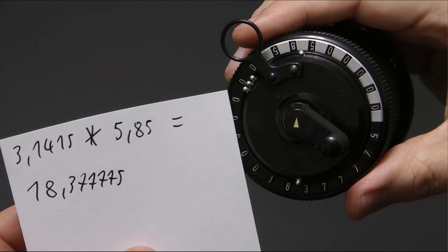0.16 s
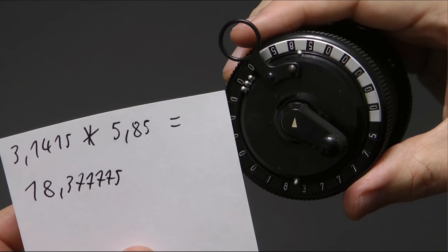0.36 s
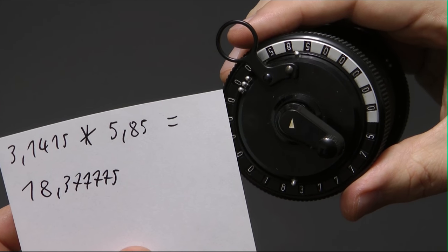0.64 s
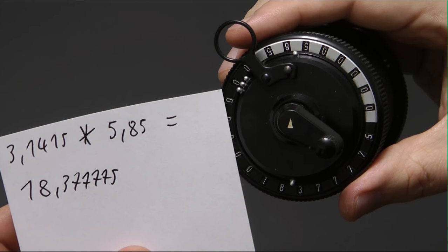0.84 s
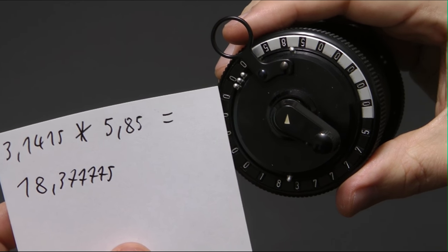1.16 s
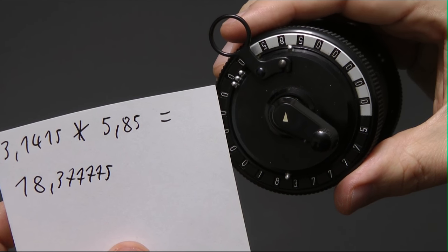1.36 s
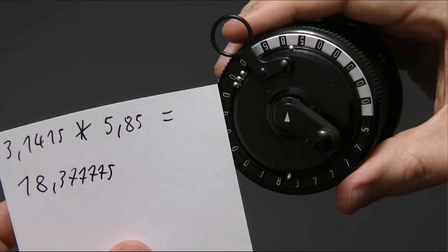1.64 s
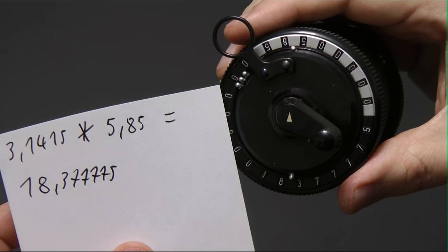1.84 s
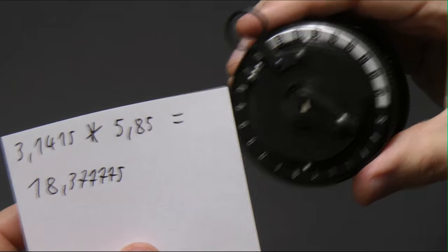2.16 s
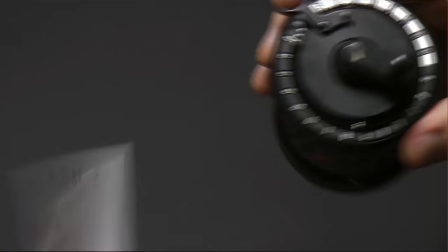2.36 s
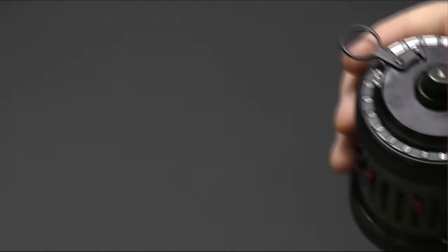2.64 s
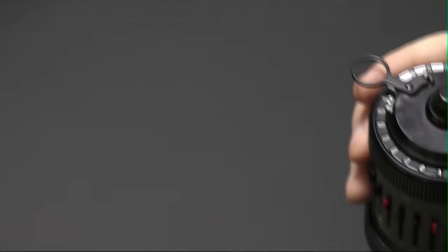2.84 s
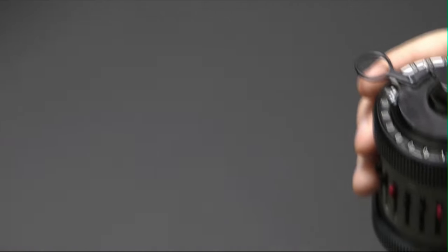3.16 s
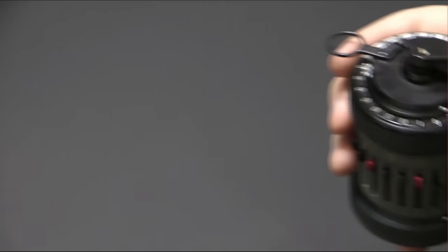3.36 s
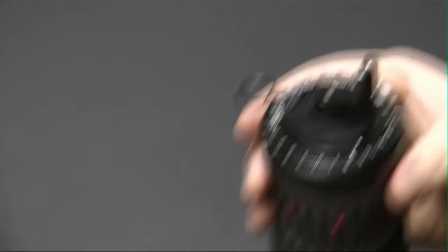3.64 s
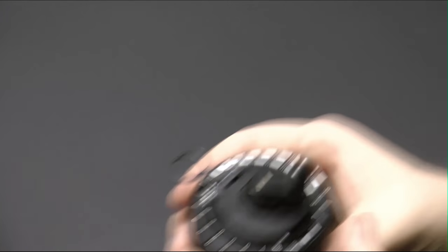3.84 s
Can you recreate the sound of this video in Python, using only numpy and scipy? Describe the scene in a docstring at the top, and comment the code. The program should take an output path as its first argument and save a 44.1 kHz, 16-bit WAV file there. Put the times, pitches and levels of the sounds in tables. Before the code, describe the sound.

A hand-held metal calculator is moved: near silence, then soft thumps, a sharp tick, paper rustle, a hollow clack, loose rattling ticks, a second clack and final tick, in a quiet reverberant room, close microphone.

```python
"""A quiet room: a hand-held metal calculator and a sheet of paper are moved about.
Two clacks are noise decays with blurred body modes; ticks and thumps are short decaying sines; paper is grainy noise.
A small motor whines in sines over hum, a thin tone that comes and goes, and filtered-noise hiss that swells slowly.
The left microphone port hears almost no bass."""
import sys
import numpy as np
from scipy import signal
from scipy.fft import rfft, irfft, next_fast_len
from scipy.io import wavfile
from scipy.ndimage import uniform_filter1d, map_coordinates

SR = 44100
rng = np.random.default_rng(int(sys.argv[2]) if len(sys.argv) > 2 else 0)


def int16_out(signal):
    """Quantize to a 16-bit WAV file."""
    q = np.round(np.clip(np.atleast_2d(signal).T, -1, 1) * 32767)
    wavfile.write(sys.argv[1], SR, q.astype(np.int16))


def how_loud(loudness_db):
    """Turn decibels into a plain amplitude multiplier (0 dB gives 1, 20 dB gives 10)."""
    steps = np.asarray(loudness_db, float) / 20
    return 10 ** steps


N = 176400

# clacks: (time [s], level [dB], build-up time constant [s], ring against wash [dB])
CLACKS = [(2.640, -22, .002, -14), (3.573, -20.5, 0.0017, -3.5)]
# one noise spectrum per clack: (frequency [Hz], relative density [dB per Hz])
CLACK_SPECTRA = [
    [(59, -41), (100, -8.5), (131, -10), (254, 5), (443, -7), (580, -2), (643, -4), (841, -5),
     (1200, -11.5), (4220, -13.5), (14000, -41.5)],
    [(59, -54), (100, -22), (198, 1), (299, 4), (353, -4.5), (568, 2), (1250, -0.5), (2790, -7),
     (3500, -4.5), (6650, -12), (14000, -43)],
]
# modes of the struck body: (frequency [Hz], relative level [dB], t60 [s])
BODY_MODES = [(259, 0, 0.32), (700, -3.5, 0.33), (865, -20, 0.49), (1021, 0.5, 0.25), (1267, -0.5, 0.49),
              (1540, 2.5, 0.25), (1918, 0.5, 0.36), (2300, -3, 0.37), (3377, 0, 0.54), (3575, -0.5, 0.54),
              (4180, -9, 0.27), (4650, -2, 0.23)]
# room reverberation: (frequency [Hz], t60 [s])
ROOM_T60 = [(150, 0.46), (400, 0.49), (1000, 0.55), (2800, 0.67), (5000, 0.62), (7500, 0.51), (12000, 0.37)]
# ticks of loose parts: (time [s], level [dB], ring [Hz], ring t60 [s], snap against ring [dB])
TICKS = [(2.471, -33, 2020, 0.018, -3), (2.540, -32, 1140, 0.026, -3), (2.5615, -14.5, 2755, .02, -3.5),
         (2.966, -33.5, 2340, 0.063, -10), (2.984, -25.5, 2650, 0.048, -18), (3.046, -26.5, 2520, 0.021, 2),
         (3.048, -35, 1530, .025, -10), (3.068, -27.5, 4370, 0.027, -3), (3.086, -24.5, 2404, 0.022, -3.5),
         (3.093, -31, 1600, .02, -10), (3.106, -34, 2420, .03, -12), (3.427, -28, 805, 0.015, 0),
         (3.839, -34, 654, 0.025, -7), (3.924, -20, 700, 0.017, -3.5), (3.9245, -31, 5160, 0.011, -22)]
# duller, softer contacts: columns as TICKS
TAPS = [(1.097, -45, 2890, 0.018, 3), (1.104, -40, 2450, .02, -1), (1.116, -37.5, 1940, .015, 4.5),
        (1.119, -37.5, 854, .04, 2), (1.126, -39.5, 1700, .03, 6), (1.133, -37, 880, .03, 0),
        (1.482, -31, 2230, 0.018, -12), (1.503, -46, 2380, .03, -6), (1.76, -42, 1990, .02, -5),
        (2.783, -33, 1000, 0.034, 0), (3.002, -36, 1590, 0.017, 4)]
# noise of a tick's snap: (frequency [Hz], relative density [dB per Hz])
SNAP_SPECTRUM = [(250, -21), (600, 3), (2000, 2.5), (5000, -4.5), (7000, -10), (12000, -31), (16000, -30)]
# noise of a dull contact: (frequency [Hz], relative density [dB per Hz])
DULL_SPECTRUM = [(400, -30), (700, 0), (2600, -2), (3400, -27), (6000, -50)]
# soft thumps of the grip: (time [s], level [dB], frequency [Hz], t60 [s])
THUMPS = [(2.474, -37, 200, 0.037), (2.481, -27.5, 266, 0.055), (2.491, -29, 224, 0.038),
          (2.506, -32, 170, 0.065), (2.514, -27.5, 170, .06), (2.538, -30, 240, 0.026)]
# paper and fingers: (time [s], body level [dB], treble level [dB], low rub level [dB])
RUSTLE = [(2.12, -68, -72.5, -75), (2.22, -58.5, -68, -74), (2.275, -54.5, -61, -64),
          (2.295, -49, -55.5, -48), (2.38, -48, -54.5, -56), (2.46, -47, -53, -55),
          (2.478, -45.5, -48.5, -48), (2.54, -42, -47.5, -45.5), (2.6, -41.5, -51, -41),
          (2.66, -42, -46.5, -52), (2.75, -56, -56.5, -56), (2.86, -62, -62, -62), (2.89, -48.5, -59, -57),
          (2.9, -46.5, -52.5, -54), (2.95, -45, -54, -49), (2.97, -42, -48, -56), (3.0, -40.5, -41.5, -56),
          (3.03, -42, -45, -58), (3.06, -38, -42.5, -49), (3.11, -41, -46, -50), (3.14, -46, -53.5, -64),
          (3.19, -51.5, -59, -68), (3.23, -55.5, -63, -68), (3.35, -60.5, -67, -75), (3.5, -60, -80, -80)]
# paper body, treble sizzle, low rub of the hand: (frequency [Hz], relative density [dB per Hz])
PAPER_SPECTRUM = [(900, -43), (1300, -10.5), (2000, -11.5), (2600, -10.5), (3700, -10.5), (5000, -17.5),
                  (6500, -32)]
SIZZLE_SPECTRUM = [(3500, -30), (5000, -3.5), (6500, -4), (9000, -9.5), (12000, -19), (15500, -29)]
HAND_SPECTRUM = [(200, -30), (350, -1), (700, -0.5), (1200, -1), (1700, -24)]
# motor whine pitch: (time [s], fundamental [Hz])
WHINE = [(0, 485), (.5, 480), (1, 476), (1.6, 474), (2.3, 474.5), (3, 477.5), (3.5, 482), (4, 488)]
# motor whine harmonics: (multiple of the fundamental, level [dB])
WHINE_ORDERS = [(1, -51.5), (2, -54), (3, -74)]
# hum and other steady tones: (frequency [Hz], level [dB])
HUM = [(118.5, -54), (570.6, -65), (3252, -80), (3413, -78), (3871, -77), (4716, -76.5), (5120, -79.5),
       (6697, -82), (7817, -91), (8371, -79.5)]
# thin tone that comes and goes: (time [s], level [dB])
THIN = [(0, -68), (.6, -67.5), (.9, -63), (1.05, -71), (1.27, -65), (1.9, -61), (2.1, -71), (4, -72)]
# hiss and rumble: (frequency [Hz], relative density [dB per Hz])
AIR_SPECTRUM = [(15, -22), (30, -7.5), (50, -11), (75, -6), (125, -3.5), (200, -6), (280, -4), (400, -8.5),
                (600, -8.5), (900, -12), (1240, -14.5), (1700, -18), (2500, -23), (3500, -24.5),
                (5000, -26), (7000, -32), (10000, -34.5), (15500, -38)]
# slow swell of hiss and rumble: (time [s], gain [dB])
SWELL = [(0, -0.5), (.6, 0.5), (2.1, 0.5), (3.3, 2), (4, 5.5)]
# left port against right: (frequency [Hz], gain [dB])
PORT = [(25, -26), (60, -30), (150, -29), (200, -22), (300, -16), (500, -10), (700, -5.5), (1000, -4.6),
        (1700, -3.8), (8000, -4), (14000, -3)]
# phase of left over right, largest in the bass, none above 1700 Hz: (frequency [Hz], phase [rad])
PORT_PHASE = [(60, 3), (200, 2.7), (300, 2.55), (500, 1.95), (700, 1.3), (1000, .8), (1400, .6), (1700, 0)]

RATTLE_DB, RATTLE_KNOTS_PER_S = 1.2, 200
BLUR_DB, BLUR_RAD = 3.5, 1.4
STRIKE_DB, STRIKE_T60_S = -1.5, 0.025
REBOUND_DELAY_S, REBOUND_DB, REBOUND_T60_S = 0.014, -2.5, 0.11
TICK_RISE_S, SNAP_T60_S, DETUNE_RATIO = 0.00083, 0.01, 0.08
ECHO_DELAY_S, ECHO_DB = 0.0074, -13
GRAINS_PER_S, GRAIN_S, GRAIN_DB, PATCHY_DB = 250, 0.004, -18, 1.8
WHINE_WAVER_DB, HUM_WAVER_DB, HUM_WAVER_RAD = 1.4, 1.5, 0.32
THIN_HZ, THIN_WAVER_DB = 1707, 2.3
AIR_DB, AIR_WAVER_DB = -48.5, 0.7
LEFT_HISS_DB, TOP_HZ, GAIN_DB = -72, 15650, 2.5


def unit(x):
    """Scaled to rms 1."""
    return x / np.sqrt(np.mean(x ** 2) + 1e-20)


def along(points, hz, col=1):
    """A column of (frequency, ..) rows, interpolated on a log axis."""
    p = np.transpose(points)
    return np.interp(np.log(hz + 1), np.log(p[0] + 1), p[col])


def curve(rows, col=1, outside=None):
    """A column of timed rows, one value per sample."""
    p = np.transpose(rows)
    return np.interp(np.arange(N) / SR, p[0], p[col], outside, outside)


def wobble(knots_per_s):
    """Smooth random curve through normal-distributed knots."""
    knots = rng.standard_normal(int(N * knots_per_s / SR) + 4)
    return map_coordinates(knots, [np.arange(N) * knots_per_s / SR])


def filtered(x, response):
    """x times a complex response of frequency."""
    m = next_fast_len(len(x) + 8192)
    spectrum = rfft(x, m) * response(np.fft.rfftfreq(m, 1 / SR))
    return irfft(spectrum, m)[:len(x)]


def coloured(x, spectrum):
    """x shaped by the given spectrum, rms 1."""
    return unit(filtered(x, lambda hz: how_loud(along(spectrum, hz))))


def sine(hz, t, phase_rad=0):
    """A sine of unit peak."""
    return np.sin(2 * np.pi * hz * t + phase_rad)


def decay(t, t60_s):
    """Exponential decay, -60 dB at t60."""
    return how_loud(-60 * t / t60_s)


def add(track, s, sound):
    """Mixes a sound in at time s."""
    part = track[round(s * SR):][:len(sound)]
    part += sound[:len(part)]


def room_tail(spectrum=((1, 0), (2, 0))):
    """Reverberation as noise, each frequency dying at its own speed; near rms 1 at its start."""
    noise = coloured(rng.standard_normal(SR), spectrum)
    hz, t, z = signal.stft(noise, SR, nperseg=256)
    z = z * decay(t, along(ROOM_T60, hz)[:, None])
    return signal.istft(z, SR, nperseg=256)[1][:SR]


def body_ring(t):
    """Body modes decay at their own rates, blurred in level and phase; rms 1 over the first 2000 samples."""
    ring = np.zeros(len(t))
    for hz, level_db, t60_s in BODY_MODES:
        level = how_loud(level_db + BLUR_DB * wobble(100.5)[:SR])
        ring += level * decay(t, t60_s) * sine(hz, t, BLUR_RAD * wobble(129.8)[:SR])
    return ring / np.sqrt(np.mean(ring[:2000] ** 2))


def clacks():
    """Blows heard mostly as room: a lumpy decay builds up quickly over a dull strike and ring, then a rebound."""
    out, t = np.zeros(N), np.arange(SR) / SR
    for (s, db, rise_s, ring_db), spectrum in zip(CLACKS, CLACK_SPECTRA):
        ring = how_loud(ring_db) * body_ring(t)
        strike = how_loud(STRIKE_DB) * decay(t, STRIKE_T60_S) * coloured(rng.standard_normal(SR), DULL_SPECTRUM)
        wash = room_tail(spectrum) * how_loud(RATTLE_DB * wobble(RATTLE_KNOTS_PER_S)[:SR])
        build_up = 1 - np.exp(-t / rise_s)
        add(out, s, how_loud(db) * build_up * (wash + strike + ring))
        rebound = decay(t, REBOUND_T60_S) * coloured(rng.standard_normal(SR), spectrum)
        add(out, s + REBOUND_DELAY_S, how_loud(db + REBOUND_DB) * rebound)
    return out


def ticks():
    """Each contact rings in two close modes with a noise snap: broad for ticks, dull for taps."""
    out, t = np.zeros(N), np.arange(SR // 8) / SR
    contacts = [(row, SNAP_SPECTRUM) for row in TICKS] + [(row, DULL_SPECTRUM) for row in TAPS]
    for (s, db, hz, t60_s, snap_db), spectrum in contacts:
        snap = how_loud(snap_db) * decay(t, SNAP_T60_S) * coloured(rng.standard_normal(len(t)), spectrum)
        second_hz = hz * (1 + DETUNE_RATIO * rng.choice([-1, 1]))
        ring = decay(t, t60_s) * (sine(hz, t) + 0.5 * sine(second_hz, t))
        build_up = 1 - np.exp(-t / TICK_RISE_S)
        add(out, s, how_loud(db) * build_up * (ring + snap))
    return out


def thumps():
    """The grip gives soft, low, quickly damped sines."""
    out, t = np.zeros(N), np.arange(SR // 8) / SR
    for s, db, hz, t60_s in THUMPS:
        add(out, s, how_loud(db) * decay(t, t60_s) * sine(hz, t))
    return out


def with_echo(direct):
    """The room answers faintly: convolution with a delayed tail of unit energy."""
    echo = np.pad(room_tail(), (round(ECHO_DELAY_S * SR), 0))
    answer = signal.fftconvolve(direct, echo / np.linalg.norm(echo))[:N]
    return direct + how_loud(ECHO_DB) * answer


def friction(spectrum):
    """Short uneven grains of noise whose spectrum shifts in patches, rms 1."""
    knots = rng.exponential(size=N) * (rng.random(N) < GRAINS_PER_S / SR)
    # running sum: each knot becomes a rectangle of GRAIN_S
    grains = np.abs(uniform_filter1d(knots, round(GRAIN_S * SR))) * GRAIN_S * SR
    lumpy = rng.standard_normal(N) * (1 + how_loud(GRAIN_DB) * grains)
    z = signal.stft(lumpy, nperseg=512)[2]
    field = uniform_filter1d(rng.standard_normal(z.shape), size=6, axis=0)
    field = uniform_filter1d(field, size=5, axis=1)
    patchy = signal.istft(z * how_loud(PATCHY_DB * unit(field)), nperseg=512)[1][:N]
    return coloured(patchy, spectrum)


def rustle():
    """Friction in three bands, each with its own level curve: paper body, treble sizzle, low rub of the hand."""
    out = np.zeros(N)
    for col, spectrum in enumerate((PAPER_SPECTRUM, SIZZLE_SPECTRUM, HAND_SPECTRUM), start=1):
        out += how_loud(curve(RUSTLE, col, outside=-120)) * friction(spectrum)
    return out


def motor_whine():
    """Harmonics of one gliding fundamental, each wavering in level."""
    turn_rad = 2 * np.pi * np.cumsum(curve(WHINE)) / SR
    tones = sum(how_loud(db + WHINE_WAVER_DB * wobble(11)) * np.sin(k * turn_rad) for k, db in WHINE_ORDERS)
    return np.sqrt(2) * tones


def hum():
    """Fixed tones, each wavering a little in level and phase."""
    out, t = np.zeros(N), np.arange(N) / SR
    for hz, db in HUM:
        level = how_loud(db + HUM_WAVER_DB * wobble(11))
        out += level * sine(hz, t, HUM_WAVER_RAD * wobble(6.5))
    return np.sqrt(2) * out


def thin_tone():
    """One sine that comes and goes in level."""
    level = how_loud(curve(THIN) + THIN_WAVER_DB * wobble(15))
    return np.sqrt(2) * level * sine(THIN_HZ, np.arange(N) / SR)


def air():
    """Hiss and rumble: shaped noise with a slow swell and a slight waver."""
    level = how_loud(AIR_DB + curve(SWELL) + AIR_WAVER_DB * wobble(4.99))
    return level * coloured(rng.standard_normal(N), AIR_SPECTRUM)


def scene():
    """One sound field at both ports."""
    handling = clacks() + with_echo(ticks() + thumps()) + rustle()
    background = motor_whine() + hum() + thin_tone() + air()
    field = handling + background
    return np.array([field, field])


def top_cut(x):
    """Nothing passes above the cut-off."""
    return signal.sosfilt(signal.butter(12, 15780, fs=SR, output="sos"), x)


def record(dry):
    """Left: bass cut, phase offset below 1700 Hz only, added hiss; both channels: band limit and gain."""
    left = filtered(dry[0], lambda hz: how_loud(along(PORT, hz)) * np.exp(1j * along(PORT_PHASE, hz)))
    left = left + how_loud(LEFT_HISS_DB) * coloured(rng.standard_normal(N), AIR_SPECTRUM)
    ports = [filtered(port, lambda hz: hz < TOP_HZ) for port in (left, dry[1])]
    mix = how_loud(GAIN_DB) * np.array(ports)
    return top_cut(mix)


dry = scene()
out = record(dry)
int16_out(out)
```